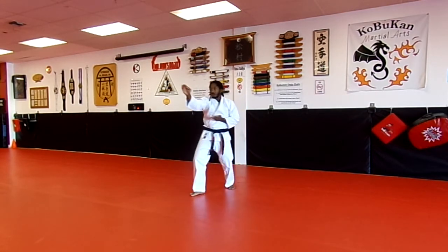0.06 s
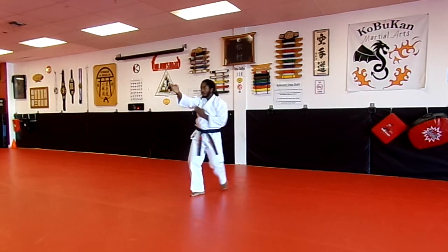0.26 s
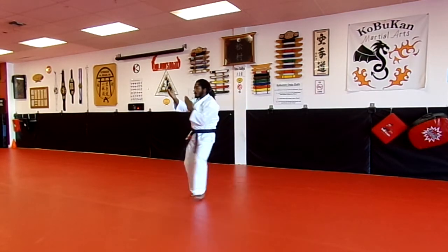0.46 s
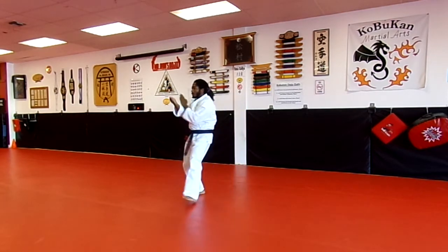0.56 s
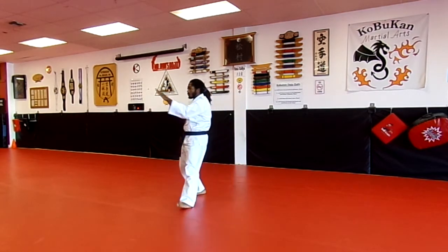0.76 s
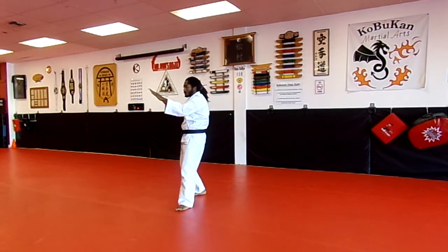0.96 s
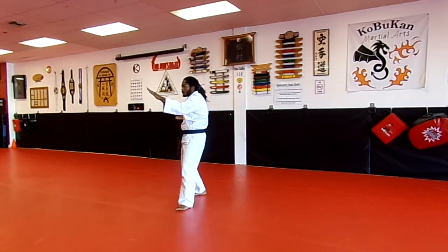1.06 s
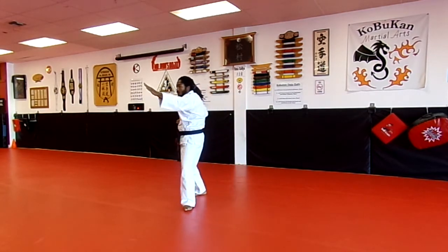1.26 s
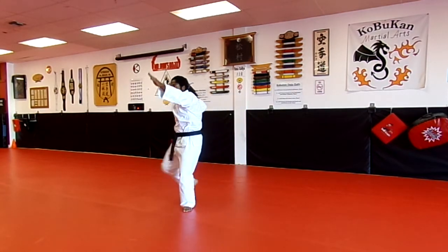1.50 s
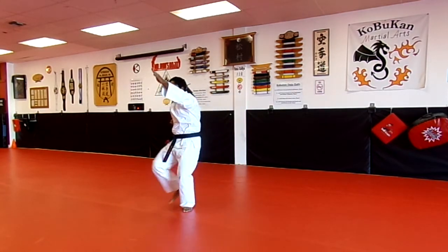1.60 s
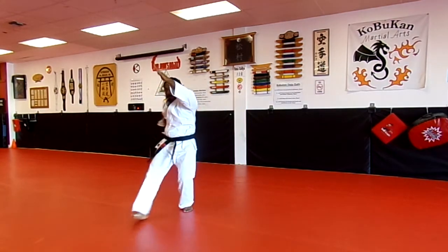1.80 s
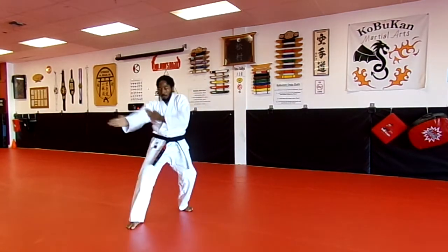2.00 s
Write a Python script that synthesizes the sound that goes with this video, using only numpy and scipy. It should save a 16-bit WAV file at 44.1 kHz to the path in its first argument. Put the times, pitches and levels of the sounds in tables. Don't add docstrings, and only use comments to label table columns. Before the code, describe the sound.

A heavy cotton sleeve snaps with one sharp, dry crack near the end, after quiet cloth swishes, tiny ticks and soft foot pats on a mat; low ventilation drone, padded hall, microphone some metres away.

```python
import sys
import numpy as np
from scipy import signal
from scipy.fft import rfft, irfft, next_fast_len
from scipy.io import wavfile
from scipy.ndimage import uniform_filter1d, map_coordinates

SR = 44100
rng = np.random.default_rng(int(sys.argv[2]) if len(sys.argv) > 2 else 0)


def ratio_of_db(decibels):
    return 10 ** (np.asarray(decibels, float) / 20)


def store_pcm(level_fs):
    pcm = np.round(np.clip(level_fs, -1, 1) * 32767).astype(np.int16)
    wavfile.write(sys.argv[1], SR, np.atleast_2d(pcm).T)


N = 90184

# (frequency [Hz], density [dB per Hz])
DUCT_SPECTRUM = [(21, -102), (35, -10), (122, 1), (145, -6.5), (264, -7), (438, -16), (613, -21),
                 (4000, -27), (11000, -52.5), (14300, -148), (22000, -120)]
# (frequency [Hz], level [dB], unsteadiness [ratio])
HUM_LINES = [(120, -55.5, .2), (212, -62, .2), (264, -64, .3), (600, -77, .5)]
# (time [s], peak level [dB], pitch [Hz])
FOOTFALLS = [
    (.048, -54, 690),
    (.116, -49, 406),
    (.255, -53.5, 800),
    (.46, -74, 244.5),
    (.665, -54, 800),
    (1.385, -50, 608),
    (1.44, -54, 670),
]
# (start [s], length [s], level [dB], centre [Hz])
CLOTH_STROKES = [(0.048, 0.027, -67.5, 6500), (0.137, 0.039, -71.5, 6450), (.07, 0.48, -66.5, 2700),
                 (0.205, 0.41, -77.5, 5800), (0.622, 0.043, -55.5, 1770), (0.436, 0.051, -60, 2500),
                 (0.578, 0.097, -57, 2270), (0.596, 0.075, -62.5, 5370), (.645, 0.05, -54.5, 2800),
                 (0.685, 0.092, -60.5, 2500), (1.082, 0.11, -78, 5000), (1.291, 0.17, -70, 2540),
                 (1.715, 0.017, -57.5, 5880), (1.736, .025, -60.5, 6100), (1.714, 0.058, -52, 3230),
                 (1.758, .025, -67, 6250), (1.786, 0.16, -62, 2600), (1.894, 0.048, -50, 2040),
                 (1.906, 0.014, -42, 6000), (.6, .04, -79, 14000), (1.722, 0.057, -60, 14100),
                 (1.907, 0.014, -36.5, 2100), (0.117, 0.28, -69, 800), (0.659, 0.057, -57.5, 920),
                 (1.347, 0.046, -63.5, 890), (1.926, .008, -46, 14300)]
# (time [s], peak level [dB], pitch [Hz])
CREASE_TICKS = [(.046, -42.5, 5000), (.056, -63, 6600), (1.353, -46, 7000), (1.367, -58, 7500),
                (1.371, -54, 8500), (1.391, -49.5, 7260), (1.741, -36, 6860), (1.7405, -62, 13700),
                (1.7755, -38, 5000), (1.7765, -28.5, 2830), (1.801, -50, 2740)]
# (time [s], peak level [dB], pitch [Hz])
AIR_POCKETS = [(.1, -46, 256.5), (.615, -45, 4000), (.622, -43, 4530), (.649, -42.5, 2900),
               (.662, -40.5, 3450), (.69, -51.5, 594), (1.908, -25, 448), (1.915, -43.5, 127),
               (1.915, -39.5, 184), (1.918, -26, 619), (1.919, -27, 762)]
# (time [s], peak level [dB], pitch [Hz])
SNAP_CREASES = [(1.9117, -17, 458.4), (1.9135, -15, 6300), (1.9152, -6.5, 5130), (1.9148, -10, 6820),
                (1.9169, -24, 6700), (1.9156, -5.5, 3230), (1.9155, -3.5, 1519), (1.9164, -6, 2136),
                (1.9172, -10.5, 2676), (1.9174, -5, 3230), (1.9174, -15.5, 1612), (1.919, -7.5, 4810),
                (1.9198, -4, 3320), (1.9212, -21.5, 760), (1.9206, -13.5, 1320)]
# (delay [s], level [dB])
WALL_ECHOES = [(.0098, -17), (0.016, -29), (.0202, -53), (.0248, -13.5), (.029, -40), (.035, -21)]
# (frequency [Hz], time to fall 60 dB [s])
HALL_DECAY = [(200, 0.4), (700, .5), (2500, 0.39), (6000, 0.44), (14000, 0.6)]
# (centre [Hz], width [Hz], depth [0-1])
HOUSING_DIPS = [(3680, 250, .92), (4380, 450, .95), (8060, 700, .9), (11760, 1300, .85)]
# (centre [Hz], width [Hz], gain over 1 [ratio])
HOUSING_RINGS = [(606, 41, 0.87), (800, 77, 0.55), (2500, 340, 0.36), (4090, 250, 0.6), (4980, 500, 0.23),
                 (7000, 280, 0.17), (8700, 1680, 1.78)]
# (frequency [Hz], gain [dB])
MIC_COLOUR = [(100, 0), (7500, 2), (10500, -10.5), (15500, -5)]
# (frequency [Hz], density [dB per Hz])
HISS_SPECTRUM = [(5590, -31), (9500, -44.5), (11500, -29), (14200, -25), (15700, -24)]


def unit(x):
    return x / np.sqrt(np.mean(x ** 2) + 1e-20)


def along(points, hz):
    f, v = np.transpose(points)
    return np.interp(np.log(hz + 1), np.log(f + 1), v)


def wobble(rate):
    knots = rng.standard_normal(int(N * rate / SR) + 4)
    return map_coordinates(knots, [np.arange(N) * rate / SR])


def filtered(x, response):
    lead_in = 2048
    m = next_fast_len(len(x) + 4 * lead_in)
    running = np.pad(x, (lead_in, 0), "reflect")
    y = irfft(rfft(running, m) * response(np.fft.rfftfreq(m, 1 / SR)), m)
    return y[lead_in:][:len(x)]


def peak(f, centre, width):
    return 1j * f * width / (centre ** 2 - f * f + 1j * f * width)


def duct_noise():
    level_db, patchy_db = -55.5, 0.5
    z = signal.stft(rng.standard_normal(N), nperseg=512)[2]
    field = uniform_filter1d(rng.standard_normal(z.shape), 6, 0)
    field = uniform_filter1d(field, 14, 1)
    patchy = signal.istft(z * ratio_of_db(patchy_db * unit(field)), nperseg=512)[1][:N]
    return ratio_of_db(level_db) * unit(filtered(patchy, lambda f: ratio_of_db(along(DUCT_SPECTRUM, f))))


def mains_hum():
    t = np.arange(N) / SR
    out = np.zeros(N)
    for hz, db, loose in HUM_LINES:
        drift = 1 + loose * (wobble(8.52) + 1j * wobble(9.5))
        out += ratio_of_db(db) * np.real(drift * np.exp(2j * np.pi * hz * t))
    return out


def flaps(rows, cycles):
    rise_cycles, fizz = 1.138, 0.25
    out, t = np.zeros(N + SR), np.arange(SR // 10) / SR
    for start, db, hz in rows:
        rise = (1 - np.exp(-t * hz / rise_cycles)) ** 2
        fade = ratio_of_db(db - 60 * t * hz / cycles)
        noise = unit(filtered(rng.standard_normal(len(t)), lambda f: peak(f, hz, hz) ** 2))
        tone = np.sin(2 * np.pi * hz * t)
        out[round(start * SR):][:len(t)] += 2 * rise * fade * (tone + fizz * noise)
    return out[:N]


def footfalls():
    return flaps(FOOTFALLS, cycles=18)


def swishes():
    rise, cloth_q = 0.22, 1.1
    grains_per_s, grain_share, spread_db = 600, 0.28, 2
    n = SR // 3
    out = np.zeros(N + SR)
    for start, length, db, hz in CLOTH_STROKES:
        draw = rng.random((n, 2))
        struck = draw[:, 0] < grains_per_s / SR
        size = ratio_of_db(-spread_db * np.log(draw[:, 1] + 0.00083))
        grains = struck * size * np.sign(draw[::-1, 0] - 0.5)
        rub = rng.standard_normal(n) + grain_share * unit(grains)
        cloth = unit(filtered(rub, lambda f: peak(f, hz, hz / cloth_q) ** 2))
        u = np.arange(n) / SR / length
        stroke = np.clip(u / rise, 0, 1) * np.exp(-np.clip(u - rise, 0, 9) ** 2 * 2)
        out[round(start * SR):][:n] += ratio_of_db(db) * stroke * cloth
    return out[:N]


def crease_ticks():
    return flaps(CREASE_TICKS, cycles=9.6)


def air_pockets():
    return flaps(AIR_POCKETS, cycles=28.3)


def snap_creases():
    return [flaps([crease], cycles=12.2) for crease in SNAP_CREASES]


def hall(x):
    tail_db, tail_delay_s, dull_hz = -7, 0.0066, 5000
    hz, t, z = signal.stft(rng.standard_normal(SR // 2), SR, nperseg=256)
    decay = ratio_of_db(-60 * t / along(HALL_DECAY, hz)[:, None])
    tail = signal.istft(z * decay, SR, nperseg=256)[1]
    tail = ratio_of_db(tail_db) * tail / np.linalg.norm(tail)
    answer = np.pad(tail, (round(tail_delay_s * SR), 0))
    for delay, db in WALL_ECHOES:
        answer[round(delay * SR)] += ratio_of_db(db)
    return filtered(signal.fftconvolve(x, answer)[:N], lambda f: 1 / (1 + 1j * f / dull_hz))


def scene():
    sources = [footfalls(), swishes(), crease_ticks(), air_pockets()] + snap_creases()
    athlete = sum(source + hall(source) for source in sources)
    return (duct_noise() + mains_hum() + athlete)[None]


def housing_rings(f):
    return 1 + sum(gain * peak(f, hz, width) for hz, width, gain in HOUSING_RINGS)


def housing_dips(f):
    return np.prod([1 - depth * peak(f, hz, width) for hz, width, depth in HOUSING_DIPS], axis=0)


def preamp_hiss():
    return ratio_of_db(-76) * unit(filtered(rng.standard_normal(N), lambda f: ratio_of_db(along(HISS_SPECTRUM, f))))


def low_pass(x):
    return signal.sosfilt(signal.butter(12, 16470, fs=SR, output="sos"), x)


def record(dry):
    low_cut_hz, top_hz = 51, 15780

    def microphone(f):
        low_cut = 1 / (1 + low_cut_hz / (1j * f + 1e-6)) ** 2
        return ratio_of_db(along(MIC_COLOUR, f)) * housing_rings(f) * low_cut

    heard = filtered(dry[0], microphone) + preamp_hiss()
    mix = filtered(heard, lambda f: housing_dips(f) * (f < top_hz))[None]
    return low_pass(mix)


dry = scene()
out = record(dry)
store_pcm(out)
```